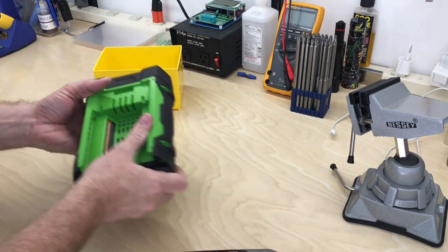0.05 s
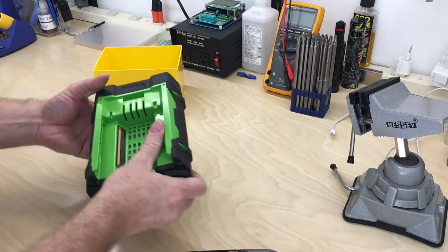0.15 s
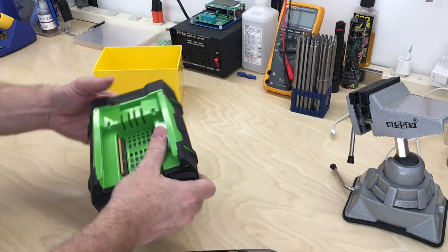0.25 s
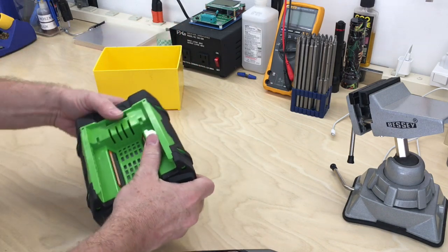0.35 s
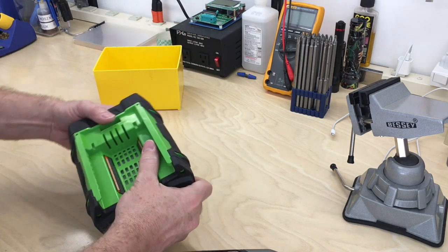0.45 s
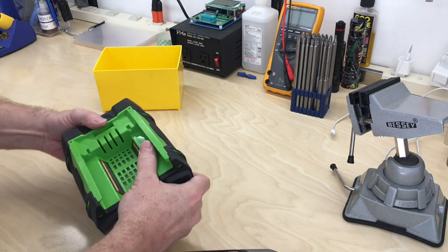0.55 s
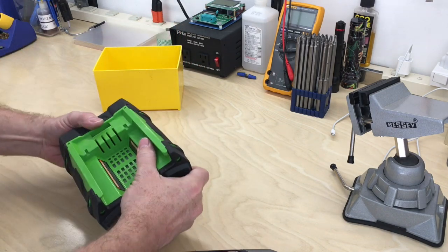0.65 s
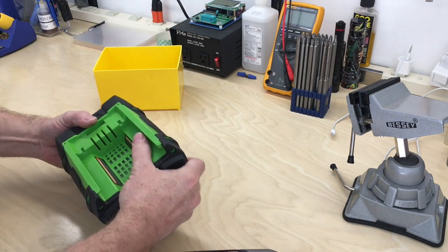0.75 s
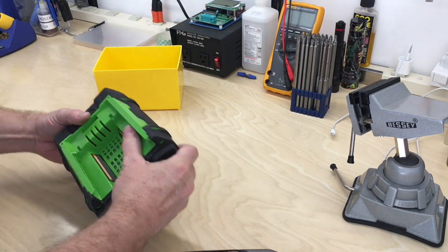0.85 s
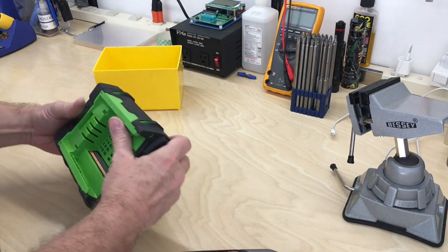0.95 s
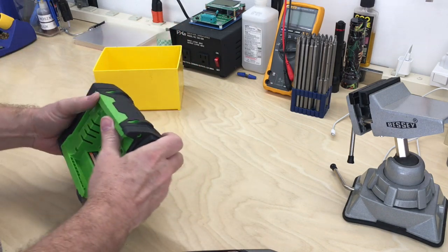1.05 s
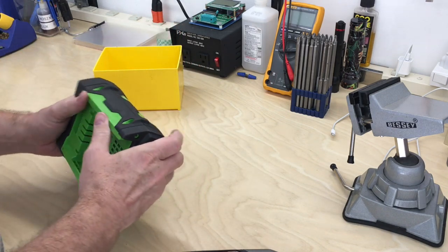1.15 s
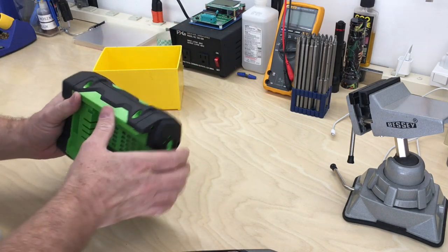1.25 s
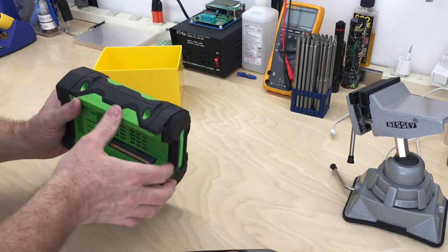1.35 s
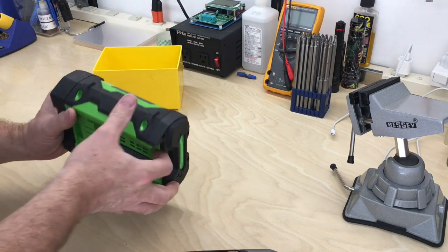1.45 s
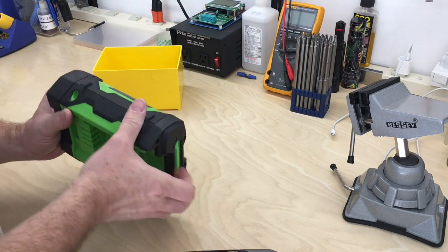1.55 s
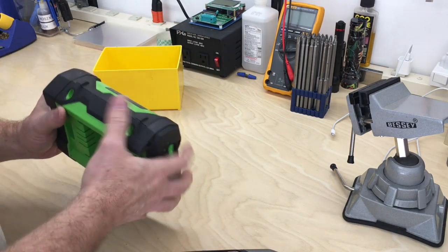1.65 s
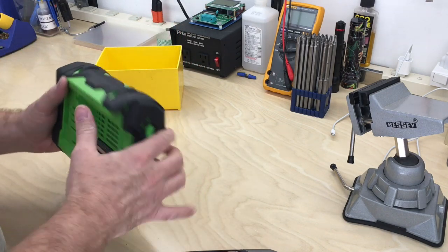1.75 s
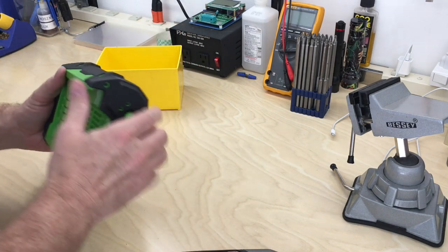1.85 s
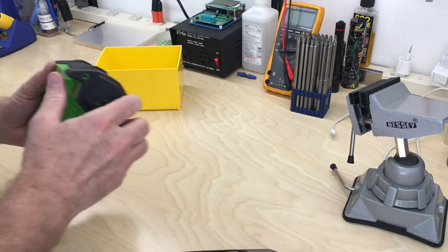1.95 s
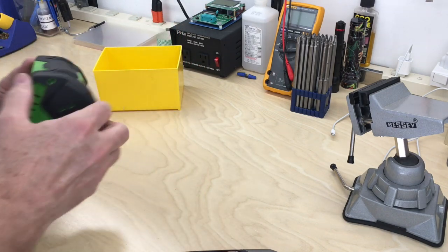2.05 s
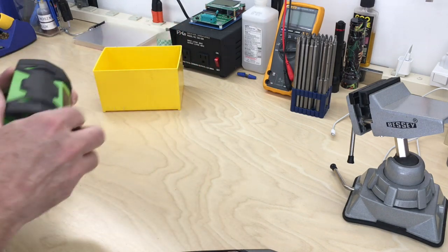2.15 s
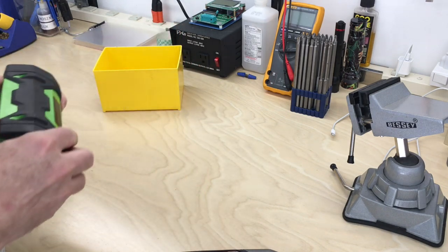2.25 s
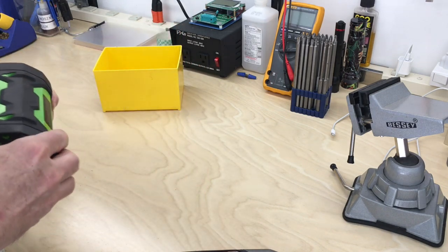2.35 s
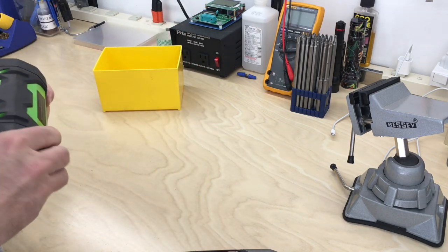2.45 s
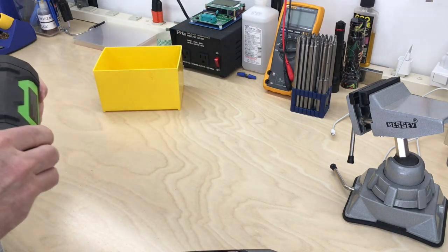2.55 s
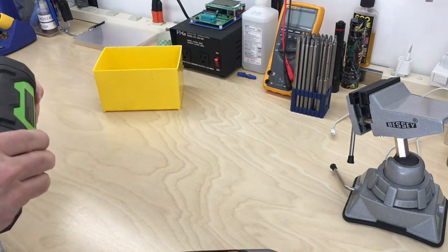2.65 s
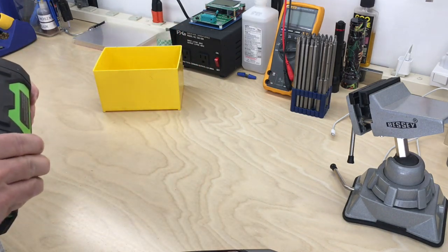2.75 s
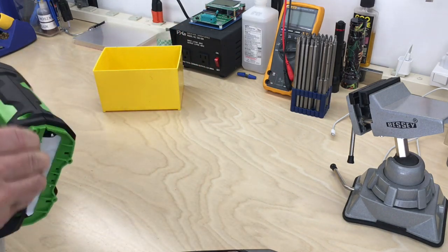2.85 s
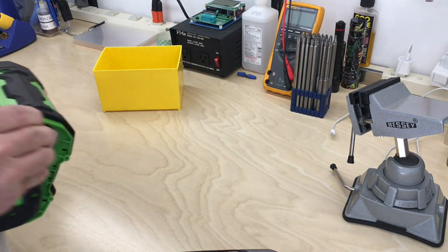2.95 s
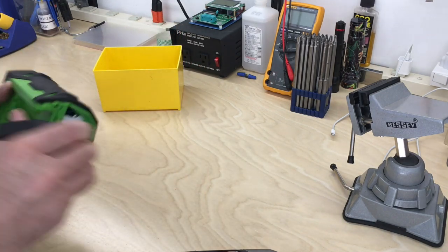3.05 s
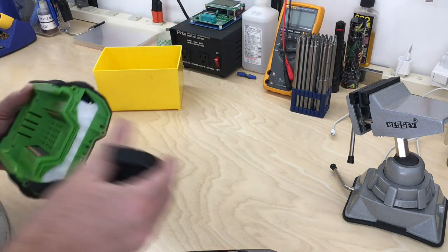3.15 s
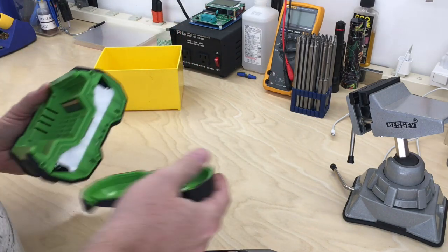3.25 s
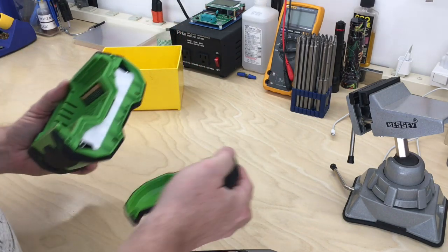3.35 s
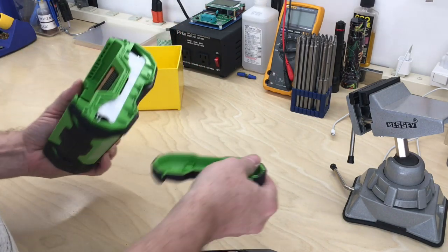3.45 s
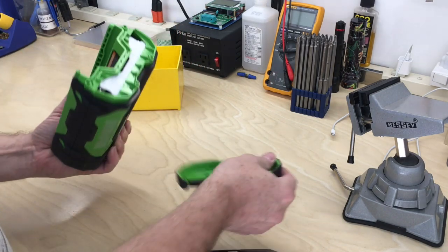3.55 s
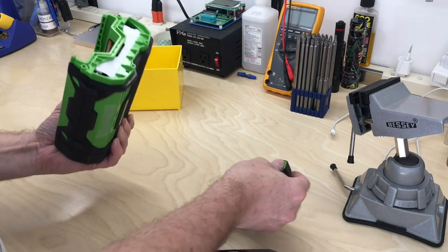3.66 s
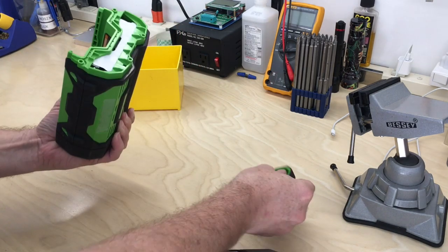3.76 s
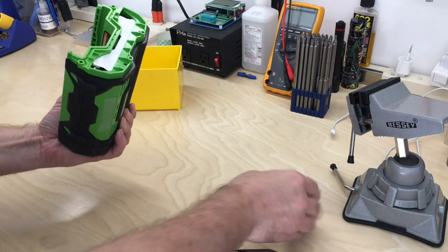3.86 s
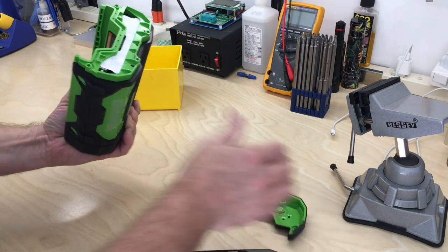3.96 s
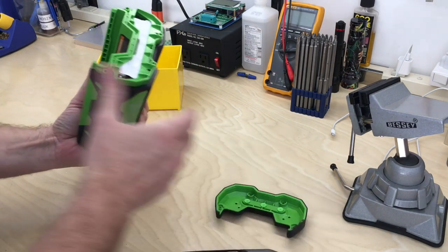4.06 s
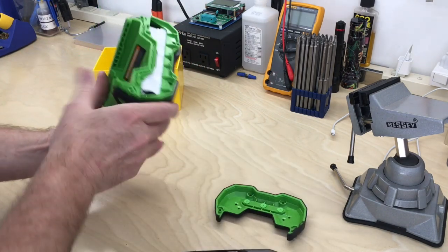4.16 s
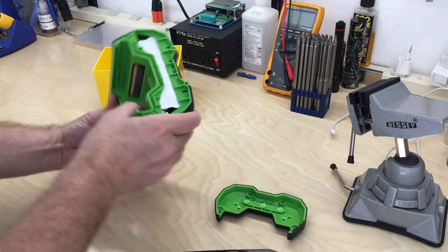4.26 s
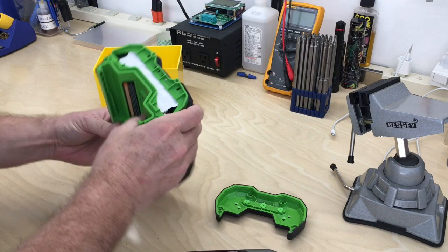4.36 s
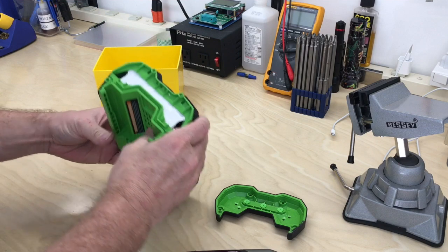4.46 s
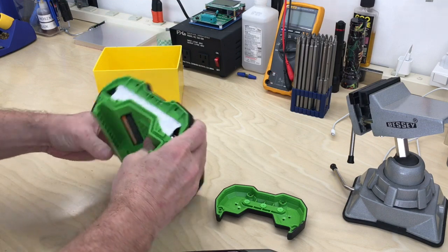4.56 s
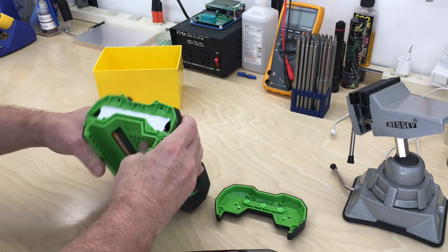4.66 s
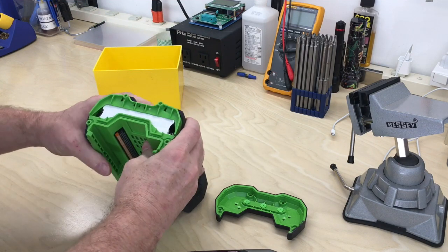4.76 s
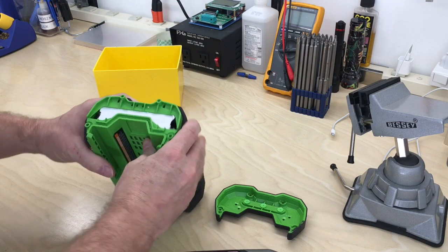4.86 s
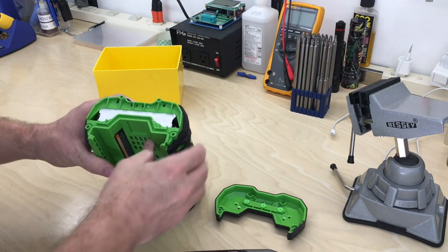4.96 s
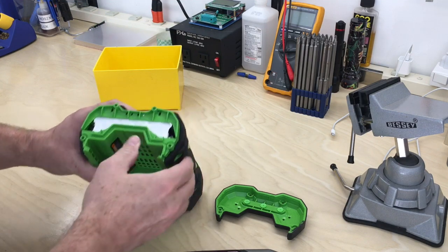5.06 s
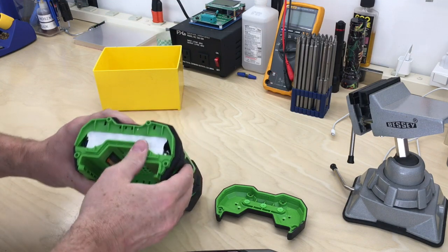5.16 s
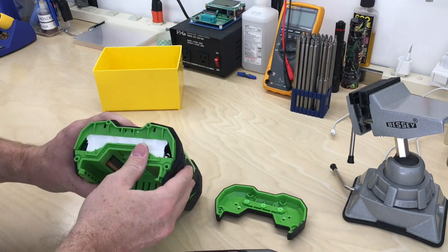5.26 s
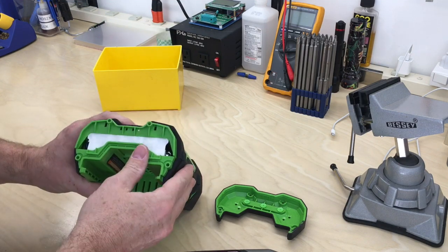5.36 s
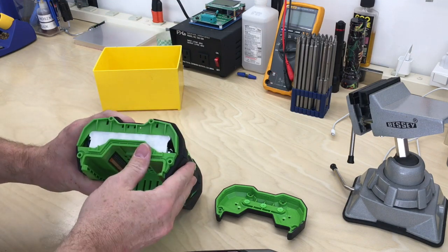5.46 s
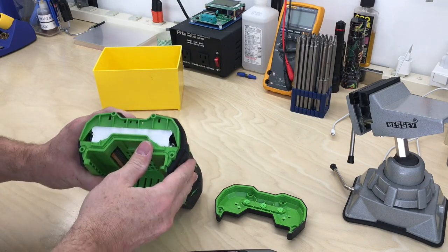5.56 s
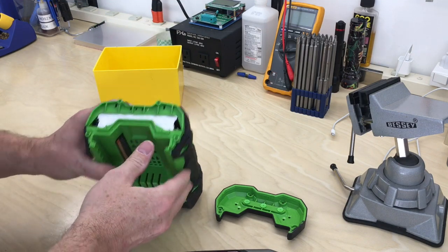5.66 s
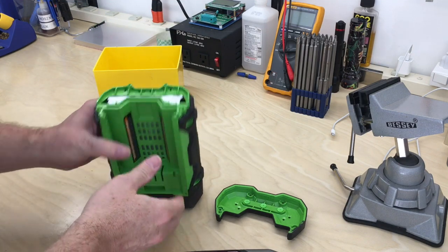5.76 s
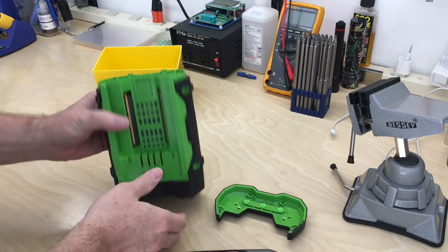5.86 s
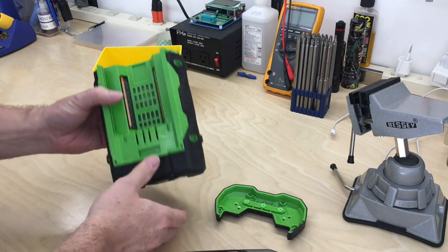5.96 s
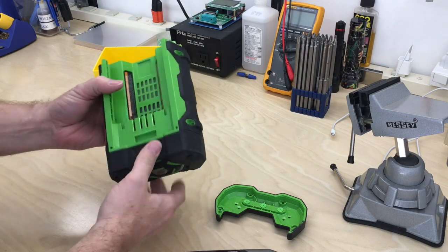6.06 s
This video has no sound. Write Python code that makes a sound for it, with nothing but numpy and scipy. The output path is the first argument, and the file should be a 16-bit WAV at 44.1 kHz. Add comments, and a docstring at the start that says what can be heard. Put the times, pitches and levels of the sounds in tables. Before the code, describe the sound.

Close, single-channel pickup at a wooden workbench. Faint finger rubbing and small clicks on a hollow plastic shell come first, over soft air hum. Several crisp cracks burst out as the end cap is pried off. The cap lands edge first, slaps flat and wobbles to rest. A low dull bump follows as the pack touches the bench, and finally another bump with a brief shell rattle.

```python
"""At a wooden bench in a small room, hands turn a battery pack over and pry off its plastic end cap.
Its catches snap free (noise cracks, shell modes); the dropped cap rocks to rest (clacks, cap modes).
The heavy pack bumps the bench twice (decaying bench modes); fingers hiss on plastic (gated noise).
Ventilation murmurs (shaped noise, tones); two birds call very faintly outside (gliding sines)."""
import sys
import numpy as np
from scipy import signal
from scipy.fft import rfft, irfft, next_fast_len
from scipy.io import wavfile
from scipy.ndimage import uniform_filter1d, map_coordinates

SR = 44100
rng = np.random.default_rng(int(sys.argv[2]) if len(sys.argv) > 2 else 0)


def persist_wave(psi):
    """Save psi, clipped to +-1, as 16-bit WAV."""
    counts = np.round(np.clip(psi, -1, 1) * 32767).astype(np.int16)
    wavfile.write(sys.argv[1], SR, np.atleast_2d(counts).T)


N = 269892
T = np.arange(SR) / SR  # s since onset

# cap landings (first touch, edge, flat): start_s, level_db, contact_corner_hz, bench_thud_db, rim_chatter_db
LANDINGS = [(3.846, -31, 850, -44, -38.5), (3.9709, -24, 1180, -53.5, -48),
            (3.9831, -18, 13800, -46.5, -26.5)]
# hiss of sliding on plastic or wood: freq_hz, relative_density_db
SLIDE_SPECTRUM = [(200, -30.5), (700, -2), (1700, -2.5), (3000, -0.5), (6000, -4), (10000, -10),
                  (15000, -12)]


def amp(db):
    """Decibels to gain."""
    return 10 ** (np.asarray(db) / 20)


def unit(x):
    """x at rms 1."""
    return x / np.sqrt(np.mean(x ** 2) + 1e-20)


def blow(x):
    """x with the energy of 5 ms at rms 1."""
    return x / np.sqrt(np.sum(x ** 2) / (.005 * SR) + 1e-20)


def along(points, hz):
    """Interpolate (Hz, value) points on a log frequency axis."""
    point_hz, value = np.transpose(points)
    return np.interp(np.log(hz + 1), np.log(point_hz + 1), value)


def add(track, start_s, x):
    """Mix x into the track from start_s."""
    start = max(round(start_s * SR), 0)
    track[start:start + len(x)] += x[:max(N - start, 0)]


def noise(spectrum, size):
    """Coloured noise of rms 1: white noise weighted across its spectrum."""
    m = next_fast_len(size)
    gain = amp(along(spectrum, np.fft.rfftfreq(m, 1 / SR)))
    return unit(irfft(rfft(rng.standard_normal(m)) * gain, m)[:size])


def soften(x, corner_hz, order=2):
    """A softer contact lasts longer and drives less treble: low-pass."""
    sos = signal.butter(order, min(corner_hz, .45 * SR), fs=SR, output="sos")
    return signal.sosfilt(sos, x)


def ring(resonances):
    """Damped resonances, struck at a new spot each time: random levels and phases."""
    hz, width_hz, db = np.transpose(resonances)[:, :, None]
    t = T[:SR // 4]
    size = amp(db + 2 * rng.standard_normal(hz.shape)) * width_hz
    phase = 2 * np.pi * (hz * t + rng.random(hz.shape))
    modes = size * np.exp(-np.pi * width_hz * t) * np.sin(phase)
    onset = 1 - np.exp(-t / 0.00091)
    return blow(np.pad(modes.sum(0) * onset, (0, SR - len(t))))


def crack(spectrum, t60_s):
    """The dense, quickly dying modes of ribbed plastic, as decaying noise."""
    return blow(noise(spectrum, SR) * amp(-60 * T / t60_s))


def in_room(x, wet_db):
    """A sound followed by its own diffuse tail, with a decay rate for each frequency."""
    # small room: freq_hz, t60_s
    room_decay = [(100, 0.31), (220, 0.93), (500, 0.56), (1500, 0.6), (4000, 0.47), (8000, 0.42),
                  (15000, 0.11)]
    hz, t, bins = signal.stft(rng.standard_normal(SR * 3 // 4), SR, nperseg=256)
    decay = amp(-60 * t / along(room_decay, hz)[:, None])
    tail = signal.istft(bins * decay, SR, nperseg=256)[1]
    tail *= 1 - np.exp(-T[:len(tail)] / 0.0025)  # reflections take a moment to build up
    tail /= np.linalg.norm(tail)
    return x + amp(wet_db) * signal.fftconvolve(x, tail)[:len(x)]


def nearby(x, echo_db):
    """The bench top and the things on it throw back weak copies within a few ms."""
    out = x.copy()
    for delay_s in rng.uniform(.0015, .009, size=5):
        lag = max(round(delay_s * SR), 1)
        out[lag:] += amp(echo_db) * rng.choice([-1, 1]) * x[:-lag]
    return out


def series(first_gap_s, stretch, count):
    """(number, delay_s) of repeated contacts whose gaps change by a fixed ratio."""
    return enumerate(np.cumsum(first_gap_s * stretch ** np.arange(count)))


def thud(rise_s, low_hz):
    """The bench top swings up under a load; a light one leaves its lowest modes still."""
    # bench top modes: freq_hz, level_db, t60_s
    bench_modes = [(60.3, -5.5, 0.21), (86.5, 0.5, 0.08), (120.1, 2.5, 0.2), (114.3, -28, 2.7),
                   (147, -12.5, 0.17), (185.9, 0.5, 0.11), (227, -16, 0.29), (279.5, -6, 0.14),
                   (340, -13.5, 0.068), (411, -21.5, 0.5)]
    swing = np.zeros(SR)
    for k, (hz, db, t60_s) in enumerate(bench_modes):
        swing += (-1) ** k * amp(db - 60 * T / t60_s) * np.sin(2 * np.pi * hz * T)
    sos = signal.butter(3, low_hz, "highpass", fs=SR, output="sos")
    return signal.sosfilt(sos, swing * (1 - np.exp(-T / rise_s)))


def ventilation():
    """A low murmur, thin hiss and two slightly unsteady tones with wandering phase."""
    # murmur: freq_hz, relative_density_db
    murmur = [(20, -12), (55, 1.5), (100, -2.5), (210, 2.5), (300, -2), (450, -14), (900, -17), (2000, -21),
              (4500, -29.5), (8000, -30), (10000, -31), (15000, -40.5)]
    # narrow band of hiss: freq_hz, relative_density_db
    thin_hiss = [(6000, -58.5), (6900, -7), (7350, 2.5), (7750, -14.5), (8600, -61.5)]
    # steady tones: freq_hz, rms_db
    hum_tones = [(220, -73.5), (1534, -85)]
    t = np.arange(N) / SR
    drift = np.cumsum(rng.standard_normal((len(hum_tones), N)), axis=1) / np.sqrt(SR)
    out = amp(-65.5) * noise(murmur, N) + amp(-89.0) * noise(thin_hiss, N)
    for (hz, db), d in zip(hum_tones, drift):
        out += amp(db) * unit(np.sin(2 * np.pi * hz * t + 4 * d))
    return out


def chirps():
    """A second bird's mostly falling note with a fast, wide warble, blurred by echoes."""
    # harsh chirps: start_s, relative_level_db
    calls = [(1.216, -54.5), (3.541, -57)]
    # contour of one chirp: time_s, centre_hz, relative_level_db
    contour = [(0, 4640, -17), (0.017, 4700, -9), (0.027, 4460, -3), (0.046, 3647, -0.5), (.056, 4000, -9),
               (0.074, 4270, -27.5)]
    out = np.zeros(N)
    times_s, hz, db = np.transpose(contour)
    level = amp(np.interp(T, times_s, db)) * (T < times_s[-1])
    for start_s, call_db in calls:
        warble = np.sin(2 * np.pi * (130 * T + rng.random()))
        rasp = unit(uniform_filter1d(rng.standard_normal(SR), size=40))
        pitch_hz = np.interp(T, times_s, hz) + 600 * warble + 250 * rasp
        note = level * np.sin(2 * np.pi * np.cumsum(pitch_hz) / SR)
        add(out, start_s, amp(call_db - 2.0) * in_room(note, wet_db=3.5))
    return out


def phrase():
    """Five short gliding whistles: three step up, two drop below them."""
    # notes: start_s, length_s, start_pitch_hz, glide_hz_per_s, relative_level_db
    notes = [(.005, .058, 3168, 3497, -1), (0.058, 0.055, 3724, 5001.5, -1),
             (0.132, .026, 4694, -7000, -0.5), (.155, .043, 2930, -500, 1), (0.196, .04, 2352, -3500, -1.5)]
    edge_s, waver_share = .012, 0.03
    out = np.zeros(N)
    for start_s, length_s, hz, glide, db in notes:
        level = amp(db) * np.clip(np.minimum(T, length_s - T) / edge_s, 0, 1)
        waver = 1 + waver_share * unit(uniform_filter1d(rng.standard_normal(SR), size=90))
        pitch_hz = (hz + glide * T) * waver
        add(out, start_s, level * np.sin(2 * np.pi * np.cumsum(pitch_hz) / SR))
    return out[:SR]


def bird(count=9):
    """The phrase repeats, slowing and swelling a little, far away and mostly echo."""
    first_s, period_s, slowing_s = .605, .296, .001
    first_db, swell_db = -82, 0.47  # swell per phrase
    out = np.zeros(N)
    for k in range(count):
        start_s = first_s + period_s * k + slowing_s * k ** 2
        add(out, start_s, amp(first_db + swell_db * k) * in_room(phrase(), wet_db=10.5))
    return out


def fingers():
    """Short strokes catch and slip on the textured plastic: a grainy hiss, and the shell sounding along."""
    # strokes (Gaussian, sigma = length / 2): middle_s, length_s, level_db
    strokes = [(0.012, .11, -66), (0.195, 0.042, -66), (.323, 0.052, -71), (0.439, 0.016, -71.5),
               (1.464, 0.043, -68), (1.634, 0.023, -63), (1.781, 0.041, -64.5), (1.971, .024, -67.5),
               (2.162, 0.12, -74.5), (2.446, 0.035, -71), (2.548, 0.011, -56), (2.885, 0.021, -48.5),
               (3.486, 0.053, -77.5), (4.298, 0.1, -71), (4.445, 0.059, -70.5), (4.728, 0.13, -74.5),
               (4.953, 0.1, -72.5), (5.256, .024, -68.5), (5.709, 0.036, -71.5)]
    # shell under a slipping finger: freq_hz, relative_density_db
    shell_scuff = [(500, -27.5), (750, -5), (1100, -7), (1450, -4.5), (1900, -2), (2300, -4.5),
                   (3200, -22.5), (6000, -44)]
    hold_db, hold_swing_db, shifts_per_s = -86, 4.5, 14  # the grip shifts faintly all the time
    t = np.arange(N) / SR
    shifts = map_coordinates(rng.standard_normal(N // 100), [t * shifts_per_s])
    slide = amp(hold_db + hold_swing_db * shifts)
    for middle_s, length_s, db in strokes:
        slide = slide + amp(db) * np.exp(-2 * ((t - middle_s) / length_s) ** 2)
    grain = unit(uniform_filter1d(rng.standard_normal(N), size=130))
    grip = unit(amp(2.1 * grain))
    hiss = noise(SLIDE_SPECTRUM, N) + amp(-5) * noise(shell_scuff, N)
    return in_room(grip * slide * hiss, wet_db=-14.5)


def pack_contacts():
    """Each bump and the ever duller rattle after it: (start_s, thud_db, knock_db, corner_hz)."""
    # bench bumps: start_s, thud_db, shell_knock_db, contact_corner_hz, rattle_db
    bumps = [(4.7772, -23, -40, 5040, -30.5), (5.8917, -24, -21.5, 1080, -27.5)]
    first_gap_s, stretch, loss_db = .0075, 1.6, 4  # loss per knock
    first_corner_hz, corner_ratio, thud_rel_db = 3870, 0.66, -23  # thud against the knock
    for start_s, thud_db, knock_db, corner_hz, rattle_db in bumps:
        yield start_s, thud_db, knock_db, corner_hz
        for k, delay_s in series(first_gap_s, stretch, count=4):
            db = rattle_db - loss_db * k
            yield start_s + delay_s, db + thud_rel_db, db, first_corner_hz * corner_ratio ** k


def pack():
    """The heavy pack thumps the bench while its shell knocks, then rocks back as a low decaying sine."""
    # shell knock: freq_hz, relative_density_db
    knock_spectrum = [(50, -28), (200, 1.5), (420, -6.5), (600, -4.5), (800, -11), (1050, -10),
                      (1700, -11.5), (2400, -15.5), (3000, -13.5), (3900, -14.5), (5000, -22),
                      (8000, -20.5), (15000, -14.5)]
    # rocking back onto the rubber corner: start_s, pitch_hz, t60_s
    settle = (4.9805, 66, .13)
    out = np.zeros(N)
    for start_s, thud_db, knock_db, corner_hz in pack_contacts():
        hit = soften(crack(knock_spectrum, t60_s=0.059), corner_hz)
        knock = amp(knock_db) * blow(nearby(hit, echo_db=-12.0))
        thump = amp(thud_db) * thud(rise_s=0.00452, low_hz=30.64)
        add(out, start_s, in_room(knock, wet_db=-11.0) + in_room(thump, wet_db=-15))
    start_s, hz, t60_s = settle
    give = 1 - np.exp(-T / .015)
    add(out, start_s, amp(-27 - 60 * T / t60_s) * give * np.sin(2 * np.pi * hz * T))
    return out


ROCK_S, ROCK_SHRINK = .0785, .84  # cap's first swing, next swing over it


def cap_contacts():
    """Landings, chatter, then ever quicker, softer rocking: (start_s, level_db, corner_hz, thud_db)."""
    chatter_gap_s, chatter_stretch, chatter_loss_db = .013, 1.17, 6.5  # loss per tap
    chatter_max_hz, chatter_thud_db = 1870, -1  # thud against the landing's
    rock_db, rock_loss_db = -29.5, 3.5  # losses per swing
    rock_thud_db, rock_thud_loss_db = -42.5, 1.2
    rock_corner_hz, rock_corner_ratio = 1700, 0.87
    second_foot_s, second_foot_db = 0.016, -6.5  # other end of the rim follows each rocking tap
    for start_s, db, corner_hz, thud_db, chatter_db in LANDINGS:
        yield start_s, db, corner_hz, thud_db
        tap_hz = min(0.69 * corner_hz, chatter_max_hz)
        for k, delay_s in series(chatter_gap_s, chatter_stretch, count=4):
            yield start_s + delay_s, chatter_db - chatter_loss_db * k, tap_hz, thud_db + chatter_thud_db
    for k, delay_s in series(ROCK_S, ROCK_SHRINK, count=5):
        start_s, db = LANDINGS[-1][0] + delay_s, rock_db - rock_loss_db * k
        corner_hz = rock_corner_hz * rock_corner_ratio ** k
        thud_db = rock_thud_db - rock_thud_loss_db * k
        yield start_s, db, corner_hz, thud_db
        yield start_s + second_foot_s, db + second_foot_db, corner_hz, thud_db + second_foot_db


def skid():
    """The rim slides on the wood just after it touches: a short swell of hiss."""
    length_s = .012
    return in_room(np.exp(-2 * (T / length_s - .7) ** 2) * noise(SLIDE_SPECTRUM, SR), wet_db=-9.0)


def cap():
    """The cap lands edge first, falls flat and rocks in ever softer taps, skidding a little."""
    # loose cap resonances: freq_hz, width_hz, relative_level_db
    cap_modes = [(295, 63, 6), (450, 25, -7.5), (615, 35, 2.5), (695, 120, -3.5), (936, 55, -8.5),
                 (1087, 280, 0), (1280, 22, 4), (1466, 25, 3), (1650, 40, 3), (1836, 44, 5.5),
                 (2210, 55, -4), (2320, 140, 5), (2540, 80, -1.5), (2995, 80, -4), (3680, 160, 0.5),
                 (4410, 110, -12), (5565, 87, -7.5), (5770, 180, -10), (6400, 130, -12.5)]
    # cap clack: freq_hz, relative_density_db
    clack_spectrum = [(60, -33), (150, -18.5), (300, -2), (800, 2), (1500, 8), (2300, 6.5), (3000, -2.5),
                      (3600, 1.5), (4400, -12), (6500, -8), (9000, -14), (11000, -25), (15000, -16.5)]
    skid_db, skid_loss_db = -48.5, 22.5  # first rocking skid, loss per swing
    out = np.zeros(N)
    for start_s, db, corner_hz, thud_db in cap_contacts():
        contact = amp(-8.5) * crack(clack_spectrum, t60_s=0.005)
        body = crack(clack_spectrum, t60_s=0.074) + amp(-1) * ring(cap_modes)
        hit = soften(contact + body, corner_hz, order=4)
        knock = amp(db) * blow(nearby(hit, echo_db=-16))
        knock += amp(thud_db) * thud(rise_s=0.0028, low_hz=137)
        add(out, start_s, in_room(knock, wet_db=-10.0))
    for start_s, db, *_ in LANDINGS:
        add(out, start_s, amp(db - 28) * skid())
    for k, delay_s in series(ROCK_S, ROCK_SHRINK, count=2):
        add(out, LANDINGS[-1][0] + delay_s, amp(skid_db - skid_loss_db * k) * skid())
    return out


def snaps():
    """Each catch cracks free and rings the hollow shell; tiny hard edges tick."""
    # catches letting go and shell clicks: start_s, level_db, contact_corner_hz
    releases = [(.432, -66, 1900), (1.474, -56, 2065), (1.531, -58.5, 9300), (1.625, -62, 6010),
                (1.79, -57, 2960), (2.548, -47, 7000), (2.560, -47.5, 1506), (2.704, -61, 900),
                (2.8161, -25, 7000), (2.8383, -25.5, 14300), (2.8875, -21.5, 4380), (2.894, -25, 6000),
                (2.9025, -17.5, 5400), (2.933, -37, 1475), (2.948, -38, 2000), (2.9528, -40.5, 7840),
                (3.0298, -51, 11950), (4.353, -47.5, 8650), (4.979, -48, 1920)]
    # tiny hard-edge ticks: start_s, level_db
    edge_ticks = [(3.247, -69), (5.8429, -59), (5.889, -43.5)]
    # shell resonances: freq_hz, width_hz, relative_level_db
    shell_modes = [(297, 40, -8), (504, 83, -19), (637, 81, -2.5), (700, 30, 2.5), (875, 30, 1.5),
                   (1067, 76, 0), (1177, 45, 0), (1220, 91, -3), (1347, 79, -0.5), (1452, 75, 3.5),
                   (1558, 84, 4.5), (1700, 77, -4.5), (2050, 48, 3.5), (2263, 38, -3), (2450, 43, -6.5),
                   (2742, 69, -7.5), (3430, 80, -12.5), (3550, 100, -2), (4390, 62, -8), (4600, 100, -12.5),
                   (5620, 81, -12.5), (6110, 110, -9.5), (6400, 140, -4), (8900, 300, -2)]
    # catch crack: freq_hz, relative_density_db
    crack_spectrum = [(60, -38), (200, -33), (450, -9.5), (750, 4.5), (1500, -1.5), (2300, -3),
                      (3200, -6.5), (6000, -9.5), (9000, -9.5), (15000, -9.5)]
    tick_spectrum = [(1000, -17), (3500, -9), (14000, -8.5)]  # freq_hz, relative_density_db
    out = np.zeros(N)
    for start_s, db, corner_hz in releases:
        burst = crack(crack_spectrum, t60_s=.035) + amp(-2.5) * ring(shell_modes)
        hit = blow(nearby(soften(burst, corner_hz), echo_db=-18))
        add(out, start_s, amp(db) * in_room(hit, wet_db=-13.0))
    for start_s, db in edge_ticks:
        add(out, start_s, amp(db) * in_room(crack(tick_spectrum, t60_s=0.0038), wet_db=-19.5))
    return out


def scene():
    """Sum of all sources, one channel."""
    return (ventilation() + chirps() + bird() + fingers() + pack() + cap() + snaps())[None]


def record(dry):
    """Sharp band limit: nothing passes at or above top_hz."""
    top_hz = 16000
    m = next_fast_len(N + 8192)
    passband = np.fft.rfftfreq(m, 1 / SR) < top_hz
    return irfft(rfft(dry, m) * passband, m)[..., :N]


dry = scene()
out = record(dry)
persist_wave(out)
```